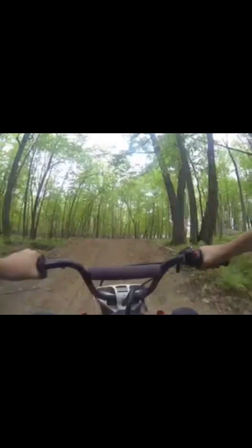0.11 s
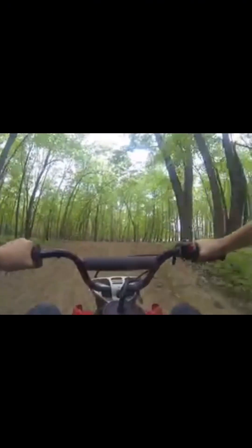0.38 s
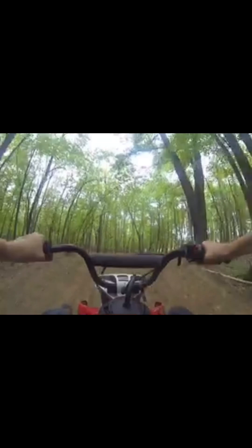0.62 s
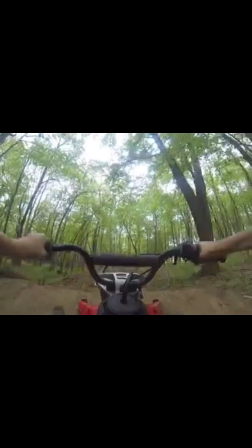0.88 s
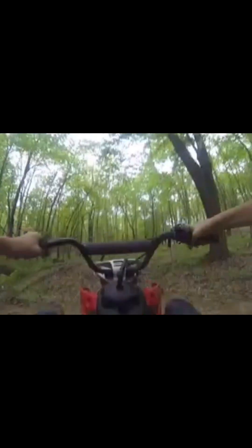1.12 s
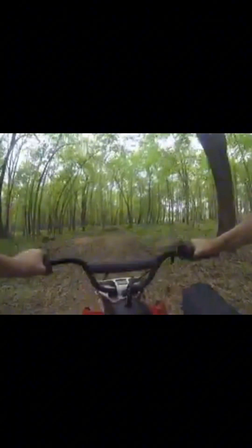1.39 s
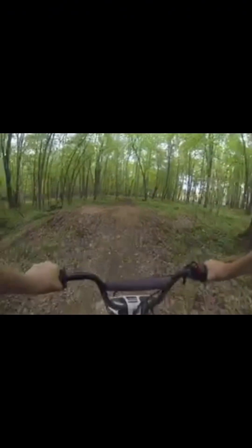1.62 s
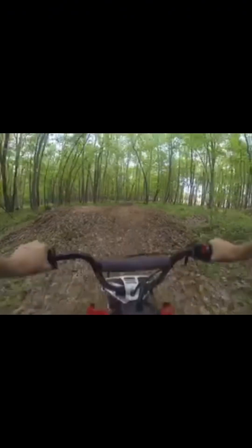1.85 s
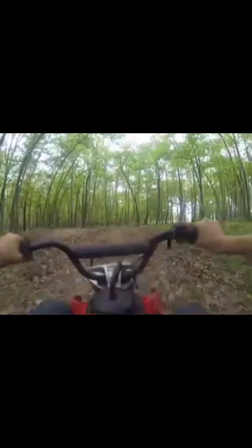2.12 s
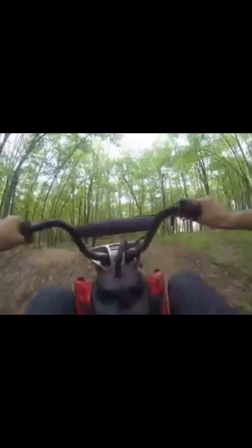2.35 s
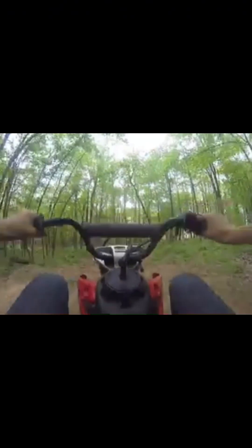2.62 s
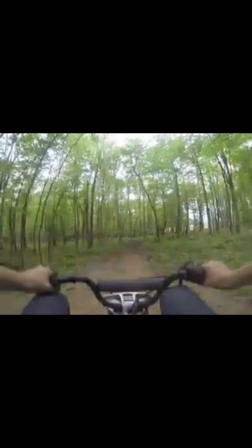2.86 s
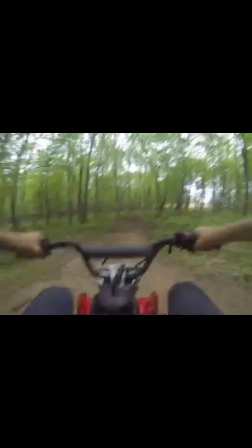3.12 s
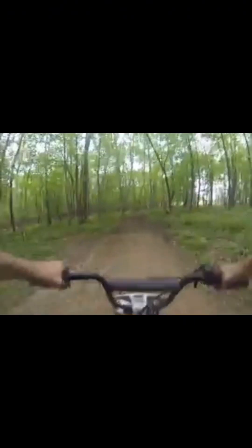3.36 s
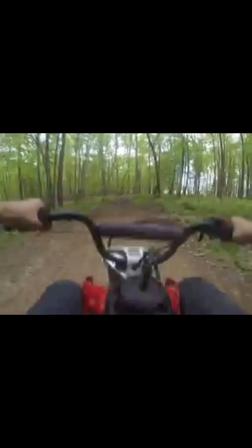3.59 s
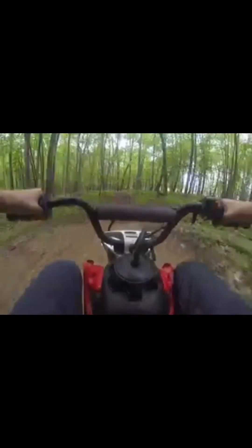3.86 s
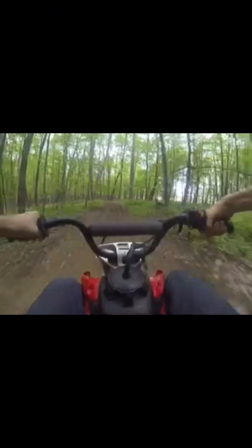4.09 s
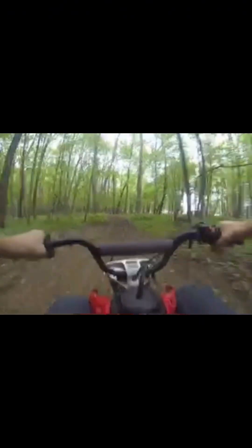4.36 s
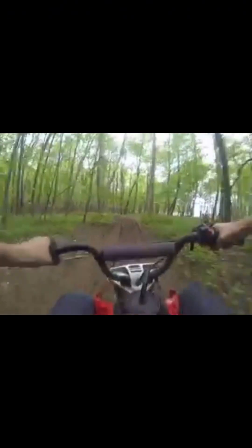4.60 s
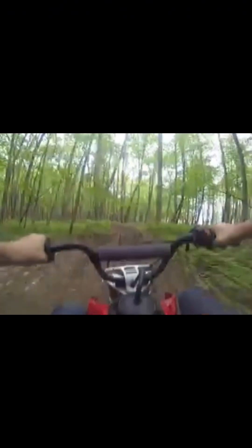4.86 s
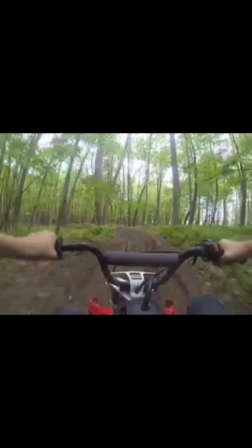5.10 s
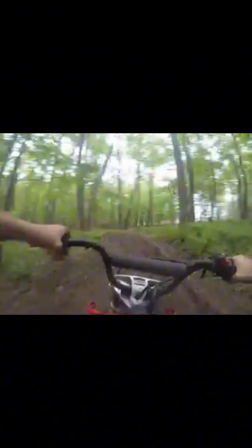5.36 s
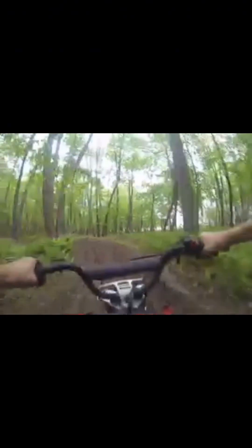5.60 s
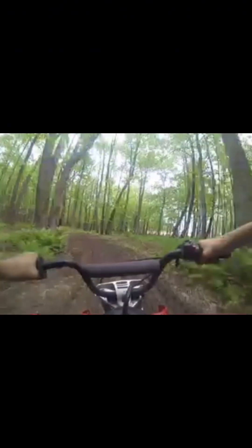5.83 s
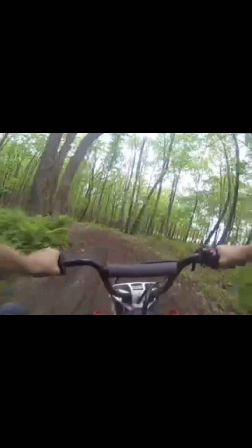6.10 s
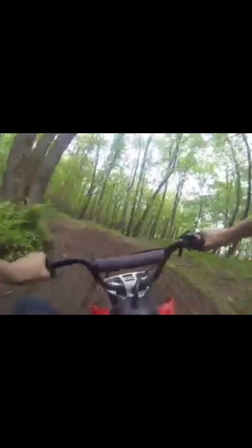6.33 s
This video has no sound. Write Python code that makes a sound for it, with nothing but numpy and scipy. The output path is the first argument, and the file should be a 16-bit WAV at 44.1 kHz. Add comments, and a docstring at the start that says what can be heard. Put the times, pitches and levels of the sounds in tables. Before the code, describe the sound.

A small single-cylinder quad runs on a bumpy dirt trail, heard close and boxy through a plastic housing on the rider. At first the engine putters steadily, booming and rasping with a mechanical whirr over low, uneven ride rumble, small rattles and a faint high electronic whine. Knocks come at about 0.3 s; around 0.8-1.2 s there are rubs, a jolt and light clatter as the engine slows, lowest near 1.6 s. A deep thump hits at 1.65 s, then a long throttle pull makes it louder and higher from 2 s. At 3.05 s hard jolts and knocks cluster and the engine briefly softens. Another thump lands at 3.5 s as it surges to its fastest by 3.7 s. More thumps follow at 4.1-4.6 s, a sharp knock at 4.7 s, and thin faint squeals near 5.1 s. The engine slows through further jolts and knocks until 6.4 s.

```python
"""A small single-cylinder quad rides a bumpy dirt trail, heard by a camera shut in a plastic housing on the rider.
From the start the engine booms, barks, rasps and whirrs over the rumble of the ride, a faint electronic whine
and small rattles; soon come the first knocks, jolts with clatter, and rubs on the housing. The engine slows,
then a long pull on the throttle ends in a cluster of hard jolts and a short pull drives the engine to its fastest.
More jolts, knocks and two thin squeals follow as the engine slows again.
Filtered noise, ringing resonances and multiples of the firing rate make these sounds."""
import sys
import numpy as np
from scipy import signal
from scipy.io import wavfile
from scipy.ndimage import uniform_filter1d

SR = 44100
rng = np.random.default_rng(int(sys.argv[2]) if len(sys.argv) > 2 else 0)


def to_wav(s):
    """Save 16-bit WAV."""
    ch = np.atleast_2d(s).T  # columns
    pcm = np.round(np.clip(ch, -1, 1) * 32767)  # PCM
    wavfile.write(sys.argv[1], SR, pcm.astype(np.int16))


def magnitude_from_level(level_db):
    """Linear magnitude for a level in decibels (20 dB per decade)."""
    exponent = np.asarray(level_db, float) / 20
    return 10 ** exponent


N = 285327

# jolts of the mount; columns: start_s, peak_db, pitch_hz
JOLTS = [(0.368, -35, 215), (1.041, -15, 83), (1.14, -30, 344), (1.366, -30.5, 230), (1.656, -11.5, 24.4),
         (2.149, -30, 123), (3.047, -10, 60.5), (3.053, -14, 156), (3.062, -8, 135), (3.068, -11, 223),
         (3.082, -4, 40.6), (3.186, -24, 240), (3.273, -16, 93), (3.431, -17.5, 82.5), (3.532, -4, 46.3),
         (4.139, -13.5, 86), (4.228, -15.5, 56.7), (4.287, -15, 113), (4.343, -19, 96), (4.364, -3.5, 48.6),
         (4.504, -16, 51.3), (4.60, -13.5, 84), (4.812, -25, 250), (4.972, -9, 87), (5.42, -18, 102),
         (5.444, -14, 129), (5.471, -28.5, 267), (5.537, -16, 127), (5.797, -16, 51.3), (6.421, -14, 44)]


def rms_one(x):
    """Scale to an rms (average strength) of 1."""
    return x / np.sqrt(np.mean(x ** 2) + 1e-20)


def in_time(rows):
    """Turn a table of times and values into smooth-running columns, one value a sample."""
    s, *columns = np.transpose(rows)
    t = np.arange(N) / SR
    return [np.interp(t, s, column) for column in columns]


def noise():
    """White noise: a plain hiss."""
    return rng.standard_normal(N)


def band(x, low_hz, high_hz, order=2):
    """Keep only the pitches between two limits (Butterworth band-pass)."""
    return signal.sosfilt(signal.butter(order, [low_hz, high_hz], "band", fs=SR, output="sos"), x)


def drift(rate_hz):
    """Slow random wandering with an rms of 1."""
    return rms_one(band(noise(), rate_hz / 8, rate_hz, order=1))


def resonate(x, modes, patchy_db=0):
    """Ring side-by-side resonances of alternating sign, each swelling and fading on its own."""
    out = 0
    for k, (hz, width_hz, level_db) in enumerate(modes):
        r = np.exp(-np.pi * width_hz / SR)   # a wider resonance dies sooner
        top = [(1 - r * r) / 2, 0, (r * r - 1) / 2]
        bottom = [1, -2 * r * np.cos(2 * np.pi * hz / SR), r * r]
        level = magnitude_from_level(level_db + patchy_db * drift(7.9))
        out = out + (-1) ** k * level * signal.lfilter(top, bottom, x)
    return out


def held(start_s, rise_s, end_s, fall_s):
    """0 to 1 in a straight rise, held, and back to 0."""
    t = np.arange(N) / SR
    rise = (t - start_s) / rise_s
    fall = 1 - (t - end_s) / fall_s
    return np.clip(np.minimum(rise, fall), 0, 1)


def exhaust(cycles, per_s, opening, modes, first, count):
    """Multiples of the firing rate, each weighted and delayed by the pipe resonances."""
    # an open throttle reshapes the gas pulse: one change_db for each multiple 1 to 16; the last serves all above
    open_change_db = [-6, 12.5, -6.5, -6, 5, 5, 6, -15.5, 6, 7.5, 12, -10, -4, 11, 9, 0]
    out = 0
    for k in range(first, first + count):
        hz = k * per_s
        pipe = sum(magnitude_from_level(level_db) / (1 + 2j * (hz - mode_hz) / width_hz) ** 2
                   for mode_hz, width_hz, level_db in modes)
        tone = (pipe * np.exp(2j * np.pi * k * cycles)).real
        change_db = open_change_db[min(k, len(open_change_db)) - 1]
        out = out + magnitude_from_level(opening * change_db) * tone
    # even out the slow changes in level
    return out / np.sqrt(uniform_filter1d(out ** 2, size=8000) + 1e-9)


def rasp(gust, pops):
    """Gusts of noise and clean firing pulses both ring the housing, making the rasp."""
    # housing resonances; columns: pitch_hz, width_hz, level_db
    rasp_modes = [(1362, 200, -1.5), (1507, 142, 3), (1775, 84, -14.5)]
    rough = rms_one(resonate(noise() * gust, rasp_modes, patchy_db=-1.0))
    clean = rms_one(resonate(pops, rasp_modes))
    return rms_one(band(rough + .75 * clean, 1200, 1900, order=3))


def whirr(gust):
    """Valves, chain and gears: dense uneven ticks, louder at each firing, ring the housing."""
    # housing resonances; columns: pitch_hz, width_hz, level_db
    housing_modes = [(640, 370, -8.5), (1534, 204, 4.5), (2290, 270, 3.5), (2690, 310, -1.5),
                     (3315, 386, -2.5), (4710, 340, -8), (5330, 280, -13.5), (6310, 650, -13),
                     (7630, 410, -16), (7980, 590, -16), (9300, 1850, -19.5), (12100, 2000, -55)]
    ticks = noise() * magnitude_from_level(0.51 * rng.exponential(1, N))
    ticks = ticks * (1 + 0.41 * gust) * magnitude_from_level(1.4 * drift(1.77))
    return rms_one(resonate(ticks, housing_modes, patchy_db=1.5))


def engine_levels(per_s, opening, close_s, pulls):
    """Levels in dB of bark, boom, rasp and whirr, following effort, throttle and engine speed."""
    # engine effort; columns: time_s, effort_db (against full pull)
    effort = [(0, -7), (.36, -9), (.7, -11.5), (.85, -8.5), (1.0, -10), (1.4, -10), (1.73, -7),
              (2.05, -0.5), (2.25, 0), (2.6, -1.5), (3.08, -3), (3.19, -15), (3.34, -11.5), (3.5, -6),
              (3.87, 0.5), (4.2, -0.5), (4.43, -3), (4.81, -1), (5.35, -2.5), (5.87, -6), (6.47, -4)]
    # how bark, boom, rasp and whirr (one row each) follow the engine; columns: full_db (level at full pull),
    # share (of effort, no unit), open_db (for open throttle), octave_db (per doubling of speed), gaining_db
    follow = [(-42, 1.1, 2.5, -0.7, -0.2), (-31.5, 0.77, 0, -0.7, -0.8), (-36.5, 1.39, 3, 4.5, 2.5),
              (-37.5, 0.92, -0.5, 3.4, -0.54)]
    cruise_per_s = 40   # firing rate at which speed adds nothing
    afterburn_s, afterburn_db = 1.45, 5.5
    gaining_per_s2, gaining_lag_s = 7.4, 0.071   # rise in firing rate that counts as pulling hard; its lag
    part_until_s, part_db = 0.73, 3

    (effort_db,) = in_time(effort)
    keep = np.exp(-1 / (gaining_lag_s * SR))
    rise_per_s2 = signal.lfilter([1 - keep], [1, -keep], np.gradient(per_s) * SR)
    gaining = np.tanh(rise_per_s2 / gaining_per_s2) * opening
    octaves = np.log2(per_s / cruise_per_s)
    bark_db, boom_db, rasp_db, whirr_db = [
        full_db + share * effort_db + open_db * opening + octave_db * octaves + gaining_db * gaining
        for full_db, share, open_db, octave_db, gaining_db in follow]
    # the bark is lifted through each pull, and the pipe keeps barking for a while after the throttle shuts
    afterburn = np.max([held(s, close_s, end_s, afterburn_s) for s, _, end_s in pulls], axis=0)
    bark_db = bark_db + afterburn_db * afterburn
    # the throttle is held a little open at first, which wakes the bark
    bark_db = bark_db + part_db * held(-1, close_s, part_until_s, close_s)
    return bark_db, boom_db, rasp_db, whirr_db


def engine():
    """Each firing rings the exhaust as boom and bark; a gust of noise after it makes the rasp."""
    # engine speed; columns: time_s, firings_per_s
    speed = [(0, 33.47), (.22, 32.3), (.58, 32.0), (.76, 33.2), (.93, 26.06), (1.59, 22.57), (2.06, 40.86),
             (2.13, 39.61), (2.31, 41.64), (2.75, 36.96), (2.91, 41.99), (3.35, 38.06), (3.7, 54.61),
             (3.8, 52.53), (4.02, 53.84), (4.1, 51.16), (4.28, 49.93), (4.45, 50.85), (6.12, 38.02),
             (6.47, 37.06)]
    # pulls on the throttle; columns: start_s, opening_time_s, let_go_s
    pulls = [(1.5, .4, 3.04), (3.36, .1, 4.03)]
    # exhaust resonances, low and high; columns: pitch_hz, width_hz, level_db
    boom_modes = [(104, 98, -1), (146.2, 44, 9.5)]
    bark_modes = [(278.4, 38, 3), (360.4, 132, 10), (413, 99, 4), (655, 360, -14)]
    close_s = .06   # time the throttle takes to shut

    (per_s,) = in_time(speed)
    opening = sum(held(s, rise_s, end_s, close_s) for s, rise_s, end_s in pulls)
    bark_db, boom_db, rasp_db, whirr_db = engine_levels(per_s, opening, close_s, pulls)

    cycles = np.cumsum(per_s) / SR + .74
    cycles = cycles + .004 * drift(25)   # slightly unsteady timing
    number, phase = cycles.astype(int), cycles % 1
    strength = rng.standard_normal((number.max() + 1, 2))[number]   # new for each firing
    uneven = uniform_filter1d(magnitude_from_level(-0.67 * strength[:, 0]), size=150)
    firings = np.diff(np.maximum.accumulate(number), prepend=number[0])
    pops = firings * uneven + 1e-18

    # the gust swells fast, then dies over part of the cycle
    through_burst = phase / .45
    swell = np.sqrt(through_burst) * np.exp(1 - through_burst * 2)
    steady = .2 + 0.096 * (1 - opening)   # more steady noise when the throttle is shut
    gust = steady + swell * magnitude_from_level(1.8 * strength[:, 1])

    boom = uneven * exhaust(cycles, per_s, opening, boom_modes, first=1, count=5)
    bark = uneven * exhaust(cycles, per_s, opening, bark_modes, first=6, count=14)
    turbulence = rms_one(resonate(noise() * gust, bark_modes))   # gas swirling in the pipe
    bark = bark + .2 * turbulence
    exhaust_sound = magnitude_from_level(bark_db) * bark + magnitude_from_level(boom_db) * boom
    return exhaust_sound + magnitude_from_level(rasp_db) * rasp(gust, pops) + magnitude_from_level(whirr_db) * whirr(gust)


def ride():
    """Slow heaving of the mount, a lumpier shake that follows it by half, and tyres on loose dirt."""
    # rough stretches of ground; columns: start_s, length_s, heave_db
    rough_ground = [(0, 1.15, -23), (1.298, 0.49, -22.5), (1.667, 0.56, -15.5), (2.238, .55, -22.5),
                    (3.02, 0.19, -18.5), (3.47, 0.13, -19.5), (3.68, 0.18, -20.5), (3.982, 0.36, -22),
                    (4.348, 0.055, -14.5), (4.425, 0.59, -17.5), (5.202, 0.4, -16), (5.802, 0.33, -15.5),
                    (6.228, 0.42, -20)]
    smooth_db, edge_s = -26.5, 0.036   # heave on smooth ground; time to fade into and out of a rough stretch
    lifts_db = [(level_db - smooth_db) * held(s - edge_s, edge_s, s + length_s, edge_s)
                for s, length_s, level_db in rough_ground]
    heave_db = smooth_db + np.max(lifts_db, axis=0)
    heave = rms_one(band(noise(), 9.1, 20.9))
    heave /= np.sqrt(uniform_filter1d(heave ** 2, size=6000) + 0.044)   # its swell follows the ground
    shake = rms_one(band(noise() * magnitude_from_level(2.5 * drift(12)), 28, 130))
    grit = rms_one(band(noise() * magnitude_from_level(3 * drift(5)), 180, 520))
    return magnitude_from_level(heave_db) * heave + magnitude_from_level(heave_db / 2 - 27.0) * shake + magnitude_from_level(heave_db / 4 - 50) * grit


def whine():
    """Electronics: two thin tones switched on for a few ms at a steady rate, slipping in phase each time."""
    # whine tones; columns: pitch_hz, level_db (rms while on)
    whine_tones = [(6449.5, -59.5), (12899, -60)]
    rate_per_s, start_s, on_s = 47.952, .005, .0082
    t = np.arange(N) / SR
    turns = (t - start_s) * rate_per_s + 1
    on = turns % 1 < on_s * rate_per_s
    slips = np.cumsum(rng.normal(0, 1.5, int(turns[-1]) + 1))   # radians
    slip = slips[turns.astype(int)]
    tones = sum(magnitude_from_level(level_db) * np.sqrt(2) * np.sin(2 * np.pi * hz * t + slip)
                for hz, level_db in whine_tones)
    return uniform_filter1d(on * 1., size=30) * tones   # softened switching


def knocks():
    """Every knock strikes all modes with new strengths and chatters a few times; small rattles come in clumps."""
    # knocks on the housing; columns: start_s, strength_db (relative), brightness_db_per_octave
    knock_list = [(0.2652, 3, 6.5), (0.3663, -8, -1), (0.891, -16.5, 6), (1.038, -20.5, -4.5),
                  (1.07, -24, 4), (1.14, -16.5, 5), (1.158, -20, -4), (1.219, -24.5, -2.5),
                  (1.417, -28, 12), (1.482, -28, 18.5), (1.487, -11, 13.5), (1.516, -23.5, 10),
                  (1.694, -28, 15), (1.947, -14.5, 1.5), (3.056, -11, 10.5), (3.064, -2, -3),
                  (3.186, -13.5, 2.5), (4.086, -23, 14.5), (4.138, -21, -7.5), (4.595, -21, 0),
                  (4.711, -6, 0), (4.74, -17, -1), (4.962, -34, 1), (5.423, -13, 0.5), (5.446, -21, 13.5),
                  (5.54, -26, 16.5), (5.76, -15.5, 8), (5.899, -12, -1), (6.41, -21.5, -4)]
    # what a knock rings with; columns: pitch_hz, level_db, ring_s (time to fall 60 dB)
    knock_modes = [(260, 0, 0.015), (457, 1, 0.014), (832, -1.5, 0.0063), (1175, -14, 0.01),
                   (1600, 3.5, 0.011), (1980, -2.5, 0.023), (2430, -7, 0.012), (2648, -7, 0.016),
                   (3390, -10, 0.0062), (4050, -21, 0.016), (5850, -18, 0.0011), (7480, -33.5, 0.0055),
                   (9500, -42.5, 0.00068)]
    s, strength_db, bright_db = np.transpose(knock_list)
    draws = rng.standard_normal((len(s), len(knock_modes) + 4))
    gaps_s = .001 * magnitude_from_level(2.0 * draws[:, -4:])   # uneven time between bounces
    small_per_s = 36.0 * magnitude_from_level(8.0 * drift(4.4))
    small_db = -46 + 2.4 * np.minimum(rng.exponential(1, N), 3)
    small = (rng.random(N) < small_per_s / SR) * magnitude_from_level(small_db)
    out = np.zeros(N)
    for k, (hz, level_db, ring_s) in enumerate(knock_modes):
        clicks = small * magnitude_from_level(level_db) * noise() + 1e-18
        blow_db = strength_db - 13.0 + level_db + bright_db * np.log2(hz / 1700) + 2 * draws[:, k]
        for bounce in range(4):
            at_s = s + gaps_s[:, :bounce].sum(axis=1)
            at = (at_s * SR).round().astype(int)
            clicks[at] += (-1) ** k * magnitude_from_level(blow_db + bounce * -3.5)   # each bounce is weaker
        r, w = magnitude_from_level(-60 / (ring_s * SR)), 2 * np.pi * hz / SR
        out += signal.lfilter([0, np.sin(w)], [1, -2 * r * np.cos(w), r * r], clicks)
    # each blow also cracks: a short burst of broad noise, 60 dB down after 43 ms
    blows = np.zeros(N) + 1e-18
    blows[(s * SR).round().astype(int)] = magnitude_from_level(strength_db - 12.5)
    crack = noise() * signal.lfilter([1], [1, -magnitude_from_level(-60 / (0.043 * SR))], blows)
    return out + band(crack, 660, 2000)


def jolts():
    """Each jolt is a push and a deeper swing back that dies in a few cycles."""
    out = np.zeros(N + SR)
    t = np.arange(SR // 4) / SR
    for s, peak_db, hz in JOLTS:
        # a jolt dies in more cycles the higher its pitch and the greater its peak
        cycles = max(1 + 0.029 * hz + 0.08 * peak_db, 1)
        swing = np.sin(2 * np.pi * hz * t) * (hz * t) ** 1.43 * magnitude_from_level(-60 * hz * t / cycles)
        i = round(s * SR)
        out[i:i + len(t)] += magnitude_from_level(peak_db) * swing / np.abs(swing).max()
    return out[:N]


def clatter():
    """Each jolt shakes loose parts: grainy low-mid noise that dies away."""
    s, peak_db, _ = np.transpose(JOLTS)
    kicks = np.zeros(N) + 1e-18
    kicks[(s * SR).astype(int)] = magnitude_from_level(-31 + 0.53 * peak_db)
    die_s = 0.17   # time to fall 60 dB
    dying = signal.lfilter([1], [1, -magnitude_from_level(-60 / (die_s * SR))], kicks)
    return dying * rms_one(band(noise() * magnitude_from_level(3.3 * drift(88)), 180, 640))


def rubs():
    """Something rubs on the housing: grainy noise in one resonance each; the narrow ones squeal."""
    # rubs; columns: start_s, length_s, level_db, pitch_hz, width_hz
    rub_list = [(0.767, 0.054, -45.5, 1260, 500), (0.926, 0.14, -51, 1600, 410),
                (1.051, 0.12, -44.5, 1730, 410), (3.39, 0.057, -45, 1590, 270), (5.08, .17, -57, 3130, 16),
                (5.07, .13, -55, 5640, 20)]
    edge_s = 0.014
    grain = noise() * magnitude_from_level(2.0 * drift(60))
    out = 0
    for s, length_s, level_db, hz, width_hz in rub_list:
        rub = rms_one(resonate(grain, [(hz, width_hz, 0)]))
        out = out + magnitude_from_level(level_db) * held(s, edge_s, s + length_s, edge_s) * rub
    return out


def scene():
    """All sources added together at the one microphone."""
    return (engine() + ride() + whine() + knocks() + jolts() + clatter() + rubs())[None]


def low_pass(x):
    """Removes everything above the highest recorded frequency."""
    return signal.sosfilt(signal.butter(12, 15350, fs=SR, output="sos"), x)


def record(dry):
    """Peaks are rounded softly and the top of the treble is cut."""
    rounded = 1.3 * np.tanh(dry / 1.3)
    top_cut = signal.cheby2(10, 30, 13600, fs=SR, output="sos")   # 30 dB down from 13600 Hz up
    mix = np.clip(signal.sosfilt(top_cut, rounded), -.99, .99)
    return low_pass(mix)


dry = scene()
out = record(dry)
to_wav(out)
```